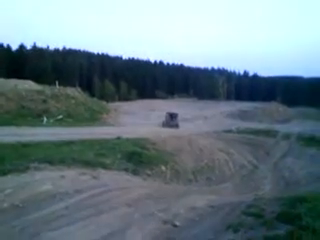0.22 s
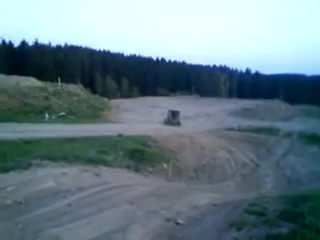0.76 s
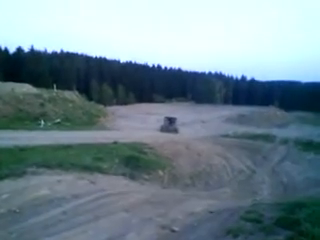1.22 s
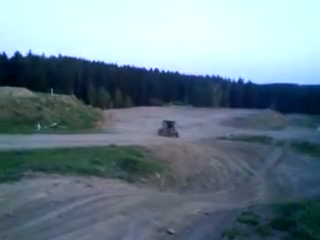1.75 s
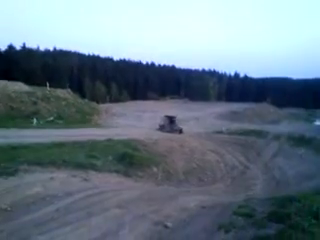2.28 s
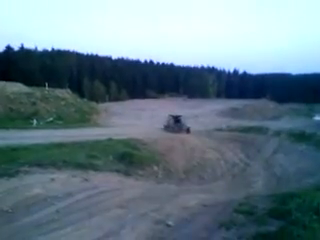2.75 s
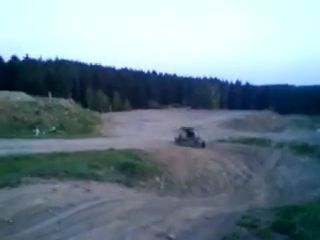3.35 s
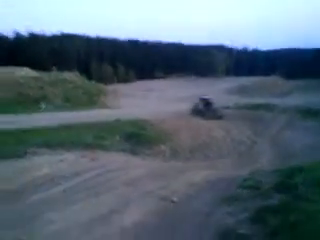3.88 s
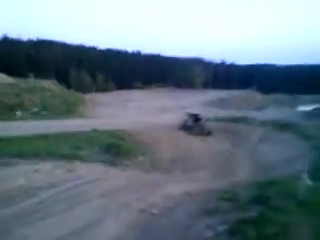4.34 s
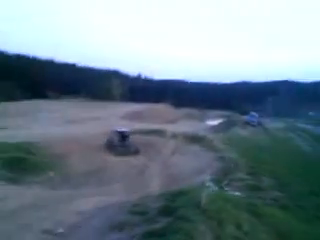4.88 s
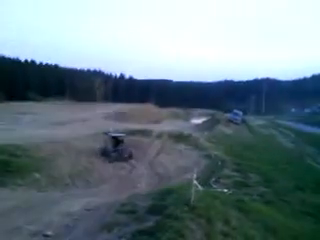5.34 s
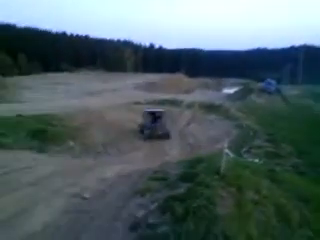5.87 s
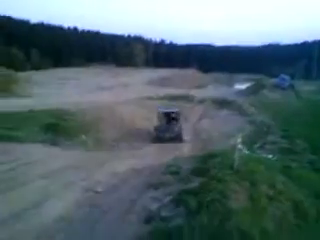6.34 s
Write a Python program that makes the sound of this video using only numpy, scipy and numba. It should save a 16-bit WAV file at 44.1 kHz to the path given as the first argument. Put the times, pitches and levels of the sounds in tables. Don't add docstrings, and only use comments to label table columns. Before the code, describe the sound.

Outdoors on a dirt track, an open buggy's engine falls from high revs and blips three times, one short and high, two longer and lower, with knocks and faint metal ticks. It then growls steadily closer, tyres hissing, while feet beside a handheld phone snap stalks and scuff grass. A final rising burst ends it.

```python
import sys
import numpy as np
from scipy import signal
from scipy.fft import rfft, irfft
from scipy.io import wavfile
from scipy.ndimage import uniform_filter1d
from numba import njit

SR = 44100
rng = np.random.default_rng(int(sys.argv[2]) if len(sys.argv) > 2 else 0)


def transcribe(u):
    v = np.clip(np.atleast_2d(u).T, -1, 1)
    q = np.round(v * 32767).astype(np.int16)
    wavfile.write(sys.argv[1], SR, q)


def voltage_ratio(decibels):
    exponent = np.asarray(decibels, float) / 20
    return 10 ** exponent


N = 291501

# strength_db, lateness (share of a firing gap)
CYLINDERS = [
    (1.5, 0.),
    (-1.2, .035),
    (.3, -.025),
    (-.6, .015),
]


def level(x, db):
    return x * voltage_ratio(db) / np.sqrt(np.mean(x ** 2))


@njit
def svf(x, hz, width):
    y, b, l = np.empty(len(x)), 0., 0.
    for i in range(len(x)):
        g, k = np.tan(np.pi * hz[i] / SR), width / hz[i]
        v = (b + g * (x[i] - l)) / (1 + g * (g + k))
        b, l, y[i] = 2 * v - b, l + 2 * g * v, k * v
    return y


def band(x, hz, width_hz):
    centre = hz + np.zeros(len(x))
    once = svf(x, centre, 1. * width_hz)
    return svf(once, centre, 1. * width_hz)


def colour(x, points):
    size = 1 << 14
    hz_points, db_points = np.transpose(points)
    hz = np.arange(size // 2 + 1) * SR / size + 1
    gain_db = np.interp(np.log(hz), np.log(hz_points), db_points)
    cepstrum = irfft(gain_db * np.log(10) / 20)
    cepstrum[1:size // 2] *= 2
    cepstrum[size // 2 + 1:] = 0
    response = irfft(np.exp(rfft(cepstrum)))[:size // 2]
    return signal.fftconvolve(x, response)[:len(x)]


def walk(rate):
    k = int(SR / rate)
    held = np.repeat(rng.standard_normal(N // k + 1), k)
    return 1.3 * uniform_filter1d(uniform_filter1d(held, k), k)[:N]


def even(x, span=0.16):
    return x / np.sqrt(uniform_filter1d(x ** 2, int(span * SR)) + 1e-12)


def add(out, s, x):
    i = int(s * SR)
    out[i:i + len(x)] += x[:N - i]


def engine():
    hz = firing_rate()
    thump_db, pipe_db, manifold_db, gas_db = throttle_levels(hz)
    pulses, smeared = firings(hz)
    leak, decay = .45, np.exp(-1 / (.004 * SR))
    puff = leak + signal.lfilter([1], [1, -decay], pulses * voltage_ratio(3.5 * walk(40)))
    return (exhaust(pulses, hz, thump_db, pipe_db) + silencer(smeared, pipe_db)
            + rasp(puff - leak, pipe_db) + manifold(pulses, puff, hz, manifold_db)
            + gas_and_tyres(puff, gas_db))


def firing_rate():
    # open_s, shut_s, open_firing_hz, shut_firing_hz, bow_hz
    blips = [
        (0.177, 0.406, 73.46, 85.6, 1.76),
        (0.696, 1.227, 51.33, 80, 0.27),
        (1.498, 2.276, 43.87, 68.2, 1.2),
    ]
    # time_s, firing_hz
    rolling = [(2.45, 43.37), (2.6, 38.8), (2.7, 47.33), (2.848, 52.5), (3.002, 48.36), (3.331, 54.2),
               (3.442, 52.85), (3.572, 48.8), (3.828, 52.81), (4.082, 55.64), (4.342, 55.8), (4.669, 62.2),
               (4.789, 59.76), (5.57, 66.65), (5.718, 64.36), (5.848, 72.67), (6.05, 79.13), (6.61, 98.8)]
    start_hz, ease = 87.43, 0.28
    u, points = np.linspace(0, 1, 12), [(0, start_hz)]
    climb = (1 - ease) * u + ease * u * u * (3 - 2 * u)
    for on, off, low_hz, high_hz, bow_hz in blips:
        bowed_hz = low_hz + (high_hz - low_hz) * climb + 4 * bow_hz * u * (1 - u)
        points += zip(on + u * (off - on), bowed_hz)
    return np.interp(np.arange(N) / SR, *np.transpose(points + list(rolling)))


def throttle_levels(hz):
    # open_s, shut_s, first_opening (0-1), last_opening (0-1), thump_change_db
    pedal = [
        (0.189, 0.4, 1.02, 1, -4.5),
        (0.719, 1.238, 0.83, 0.99, -2.5),
        (1.51, 2.289, 0.7, 0.92, -0.5),
        (2.675, 5.753, 0.66, 0.65, -10),
        (5.741, 6.695, 1.02, 0.72, 0.5),
    ]
    # firing_hz, level_db
    thump_curve = [(38, -49), (44, -42), (51, -32), (61, -25.5), (73, -23), (98, -22)]
    # time_s, level_db
    approach = [(0, 0.5), (2.6, -2.5), (3.0, 1), (4.0, 4.5), (5.0, 3), (5.6, 7), (5.9, 3.5), (6.61, 9.5)]
    move_s, dip_db = .035, -14.5
    surge_s, wobble = 0.0021, 0.089
    t = np.arange(N) / SR
    load, change_db, moving = np.zeros((3, N))
    for on, off, first, last, db in pedal:
        pressed = np.clip(np.minimum(t - on, off - t) / move_s + .5, 0, 1)
        load = load + pressed * np.interp(t, [on, off], [first, last])
        change_db = change_db + pressed * db
        moving = np.maximum(moving, 4 * pressed * (1 - pressed))
    climb = uniform_filter1d(np.gradient(hz) * SR, SR // 10)
    rolling = (t > pedal[3][0]) & (t < pedal[3][1])
    rocking = surge_s * np.clip(climb, -40, 40) + wobble * walk(7.004)
    load = load + uniform_filter1d(1. * rolling, SR // 10) * rocking
    near_db = np.interp(t, *np.transpose(approach))
    octaves = np.log2(hz / 60)
    thump_db = np.interp(hz, *np.transpose(thump_curve)) + change_db + dip_db * moving
    pipe_db = -28.5 + 11.5 * load + octaves
    manifold_db = -54.5 + 12 * load + near_db
    gas_db = -49.5 + 3 * load + 1.34 * near_db - 3.5 * octaves
    return thump_db, pipe_db, manifold_db, gas_db


def firings(hz):
    # time_s, factor
    unevenness = [(0, .8), (2.3, .8), (2.7, 1.0), (5.7, 1.0), (5.85, .55), (6.61, .55)]
    scatter_db, scatter_late = .8, .009
    turns = np.cumsum(hz) / SR
    count = np.arange(int(turns[-1]))
    chance = rng.standard_normal((3, len(count)))
    own_db, own_late = np.array(CYLINDERS)[count % len(CYLINDERS)].T
    fire_s = np.interp(count, turns, np.arange(N) / SR)
    lumpy = np.interp(fire_s, *np.transpose(unevenness))
    at = np.searchsorted(turns, count + lumpy * (own_late + scatter_late * chance[0]))
    pulses, smeared = np.zeros((2, N))
    pulses[at] = voltage_ratio(lumpy * (own_db + scatter_db * chance[1]))
    path_s = .0006 * (3 + np.clip(chance[2], -3, 3))
    smeared[at + (SR * path_s).astype(int)] = pulses[at]
    return pulses, smeared


def exhaust(pulses, hz, thump_db, pipe_db):
    # hz, gain_db
    pipe_gain = [(8, -72), (40, -24.5), (70, 3), (100, 0), (148, 7), (188, -3), (218, -7), (260, -10.5),
                 (320, -23), (450, -70.5)]
    thump = band(pulses, hz, 19)
    ring = colour(pulses, pipe_gain)
    ring = ring - .9 * band(ring, hz, 23)
    return -voltage_ratio(thump_db) * even(thump) - voltage_ratio(pipe_db) * even(ring)


def silencer(smeared, pipe_db):
    # hz, gain_db
    box_gain = [(8, -92), (150, -40.5), (210, -14.5), (260, -1), (310, 0.5), (350, -15), (400, -22.5),
                (520, -61.5)]
    bank_s, bank_db = 0.00854, -3
    echo = voltage_ratio(bank_db) * np.roll(smeared, int(bank_s * SR))
    return -voltage_ratio(.7 * pipe_db - 21.5) * even(colour(smeared + echo, box_gain))


def rasp(puff, pipe_db):
    return voltage_ratio(pipe_db - 30) * even(band(puff * rng.standard_normal(N), 1290, 410))


def manifold(pulses, puff, hz, manifold_db):
    lift = 1 + 0.83 * np.maximum(hz / 76 - 1, 0)
    hiss = even(band(puff * rng.standard_normal(N), 623 * lift, 350))
    main = band(pulses, 640 * lift, 220)
    notch = voltage_ratio(-12.5) * band(pulses, 830 * lift, 130)
    upper = voltage_ratio(-12) * band(pulses, 1344, 450)
    note = even(main - notch + upper)
    near = np.clip((manifold_db + 45) / 7, .2, 1.7)
    return voltage_ratio(manifold_db - 1.0) * (hiss + near * note)


def gas_and_tyres(puff, gas_db):
    # time_s, level_db
    tyre_curve = [(0, -0.5), (2.5, -14), (4.3, -5), (5, -0.5), (5.6, 0.5), (6.61, -11)]
    gas = even(band(puff * rng.standard_normal(N), 1520, 710))
    tyre_db = np.interp(np.arange(N) / SR, *np.transpose(tyre_curve)) + 2.3 * walk(7.4)
    tyres = voltage_ratio(tyre_db) * even(band(rng.standard_normal(N), 1960, 570))
    whirr = even(band(puff * rng.standard_normal(N), 3600, 3100))
    return voltage_ratio(gas_db - 5.5) * (gas + tyres + voltage_ratio(-5.0) * whirr)


def knock_times():
    # first_s, last_s, first_peak_db, last_peak_db, low_ring_db
    spells = [(0.2384, .3377, -13.5, -13.5, -12.5), (0.7493, .8944, -18.5, -19.5, -13),
              (0.9507, 1.1787, -18, -16.5, -8.5), (1.8333, 1.9707, -19.5, -19, -7),
              (2.0357, 2.2834, -16, -20, -14), (2.8804, 3.0425, -22, -23.5, -11),
              (3.2023, 3.4281, -24.5, -21.5, -4), (3.5848, 3.5848, -34, -24, -10),
              (4.127, 4.2674, -19.5, -28, -20), (5.69, 5.9195, -17, -23.5, 2),
              (5.9689, 6.2188, -24.5, -21.5, 8), (6.2634, 6.4878, -20.5, -20, 1.5)]
    ring_hz, spread_hz, scatter_db = 1298, 70, .8
    t, rows = np.arange(N) / SR, []
    cycles = np.cumsum(firing_rate()) / SR / len(CYLINDERS)
    for first, last, first_db, last_db, low_db in spells:
        begin, end = np.interp([first, last], t, cycles)
        for u in np.linspace(0, 1, int(round(end - begin)) + 1):
            chance = rng.standard_normal(3)
            rows.append((np.interp(begin + u * (end - begin), cycles, t),
                         first_db + u * (last_db - first_db) + scatter_db * chance[0],
                         ring_hz + spread_hz * chance[1],
                         low_db + 2 * scatter_db * chance[2]))
    return rows


def knocks():
    out, t = np.zeros(N), np.arange(int(.04 * SR)) / SR
    blow = np.minimum(t / .0006, 1) * np.exp(-t / .0055)
    for s, db, hz, low_db in knock_times():
        burst = blow * rng.standard_normal((3, len(t)))
        high = band(burst[0], hz, 310)
        low = band(burst[1], 655, 210)
        edge = band(burst[2], 2100, 1100) + voltage_ratio(-5.5) * band(burst[2], 2100, 400)
        rings = high / abs(high).max()
        rings = rings + voltage_ratio(low_db + 2) * low / abs(low).max()
        rings = rings + voltage_ratio(-15) * edge / abs(edge).max()
        add(out, s, voltage_ratio(db - 6.5) * rings)
    return out


def ticks():
    # start_s, peak_db
    taps = [(0.045, -46), (0.366, -46), (.6866, -56), (.7512, -42), (0.7813, -48), (.847, -46),
            (1.1573, -52), (1.3464, -47), (1.407, -49), (1.5339, -50), (1.5643, -56), (1.754, -44),
            (1.8174, -47), (1.941, -48), (1.974, -47), (2.1937, -51), (2.386, -46), (2.4489, -46),
            (2.5104, -42.5), (2.6706, -46), (2.7002, -44)]
    out, t = np.zeros(N), np.arange(int(.02 * SR)) / SR
    mode = np.minimum(t / 0.0011, 1) * np.exp(-t / 0.004) * np.sin(2 * np.pi * 3340 * t)
    for s, db in taps:
        add(out, s, voltage_ratio(db + 3.0) * mode)
    return out


def snaps():
    # start_s, peak_db, crack_hz, thud_peak_db, splinter_peak_db
    breaks = [(2.5454, -42.5, 2770, -21.5, -35), (3.1283, -16.5, 5570, -8.5, -14.5),
              (3.4463, -25.5, 3223, -18.5, -23.5), (3.5103, -17, 3993, -18, -19.5),
              (3.7647, -20, 3640, -14, -24.5), (3.7761, -18, 3950, -43, -24.5),
              (4.065, -25.5, 4902, -40.5, -50), (4.17, -16, 5020, -48, -32), (4.388, -23, 2542, -27, -36),
              (4.4182, -27, 2860, -39, -30), (5.251, -34, 2830, -21, -23), (6.2895, -22, 3640, -17, -32),
              (6.55, -22, 3780, -18, -8), (6.563, -27, 4208, -34.5, -24)]
    t60_s = .011
    out, t = np.zeros(N), np.arange(int(.08 * SR)) / SR
    fade = np.exp(-np.log(1000) * np.maximum(t - .002, 0) / t60_s)
    thud = np.minimum(t / 0.000091, 1) * np.exp(-t / 0.0031) * np.sin(2 * np.pi * 385 * t)
    for s, db, hz, thud_db, splinter_db in breaks:
        noise = rng.standard_normal((2, len(t)))
        crack = band(fade * noise[0], hz, 7500)
        splinter = band(fade * noise[1], 1200, 2000)
        body = voltage_ratio(thud_db) * thud + voltage_ratio(splinter_db) * splinter / abs(splinter).max()
        add(out, s, voltage_ratio(db) * crack / abs(crack).max() - body)
    return out


def scuffs():
    # start_s, loudest_s, end_s, level_db, low_part_db
    drags = [(3.13, 3.145, 3.2, -45, 3.5), (3.3, 3.385, 3.42, -42, -10), (3.37, 3.385, 3.4, -58, 21),
             (3.43, 3.47, 3.51, -47, -20), (3.52, 3.535, 3.55, -45, 6), (3.683, 3.7, 3.725, -37.5, .5),
             (3.76, 3.81, 3.96, -38.5, -6.5), (3.84, 3.855, 3.88, -44, 3), (4.25, 4.32, 4.36, -42, -11.5),
             (4.35, 4.4, 4.46, -42.5, 7), (4.678, 4.692, 4.712, -41, .5), (4.7, 4.73, 4.75, -25, -.5),
             (5.24, 5.252, 5.262, -39.5, -30), (5.9, 6.25, 6.6, -61, -14), (6.28, 6.295, 6.33, -47.5, 6)]
    out = np.zeros(N)
    for start, loudest, end, db, low_db in drags:
        t = np.arange(start, end, 1 / SR)
        rise_fall = np.interp(t, [start, loudest, end], [0, 1, 0])
        swell = np.sin(np.pi / 2 * rise_fall) ** 1.2
        grain_db = 3 * rng.exponential(size=(2, len(t)))
        grit = rng.standard_normal((2, len(t))) * voltage_ratio(grain_db)
        rustle = level(band(grit[0], 4120, 3800), db)
        drag = level(svf(grit[1], 700 + 0 * t, 1000.0), db + low_db)
        add(out, start, swell * (rustle + drag))
    return out


def air():
    # hz, level_db (per Hz)
    spectrum = [(190, -40), (330, -10.5), (502, -24), (907, -5), (1030, -33.5), (1440, 10.5), (1570, -15),
                (2590, -23), (3320, -37), (6670, -24.5), (7600, -43), (9880, -73), (16700, -120)]
    hz_points, db_points = np.transpose(spectrum)
    hiss = np.zeros(N)
    for hz in 400 * 2 ** np.arange(0, 4.3, 1 / 3):
        band_db = np.interp(np.log(hz), np.log(hz_points), db_points) + 1.5 * walk(5.6)
        hiss += voltage_ratio(band_db) * band(rng.standard_normal(N), hz, hz / 3)
    wind = voltage_ratio(4.4 * walk(18)) * band(rng.standard_normal(N), 54, 48)
    return level(hiss, -45.5) + level(wind, -41)


def scene():
    return (engine() + knocks() + ticks() + snaps() + scuffs() + air())[None]


def band_limit(x):
    return signal.sosfilt(signal.butter(12, 7970, fs=SR, output="sos"), x)


def record(dry):
    sound = signal.sosfilt(signal.butter(4, 5840, fs=SR, output="sos"), dry)
    sound = signal.sosfilt(signal.ellip(10, .3, 60, 7250, fs=SR, output="sos"), sound)
    clock = 2 * np.pi * 4000 * np.arange(N) / SR
    mirrors = sound * (voltage_ratio(-43.5) * np.cos(clock) + voltage_ratio(-54.5) * np.cos(2 * clock))
    return band_limit(sound + mirrors)


dry = scene()
out = record(dry)
transcribe(out)
```